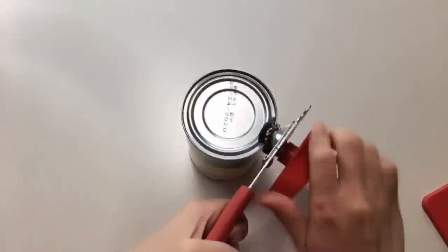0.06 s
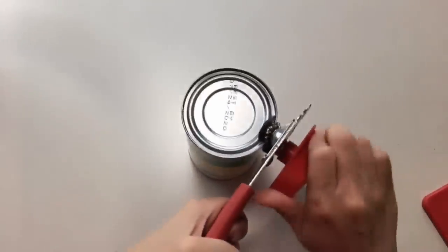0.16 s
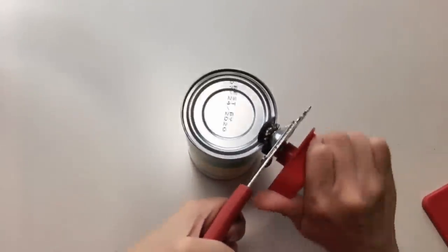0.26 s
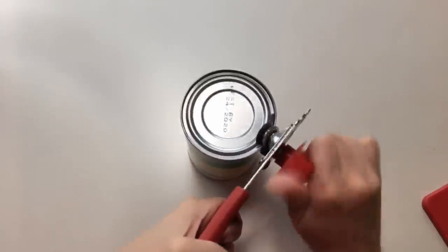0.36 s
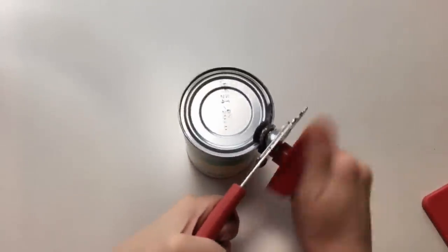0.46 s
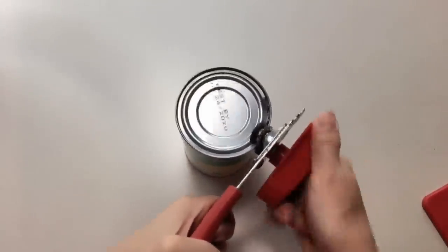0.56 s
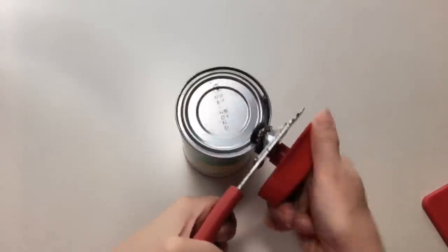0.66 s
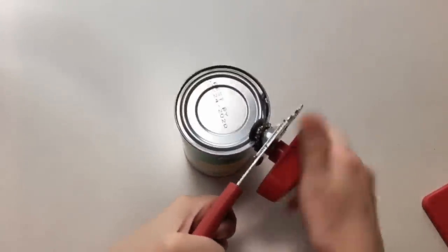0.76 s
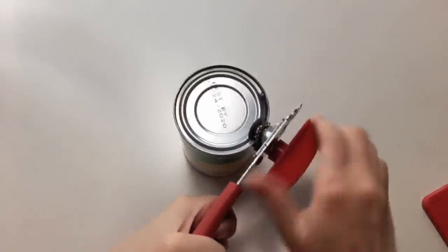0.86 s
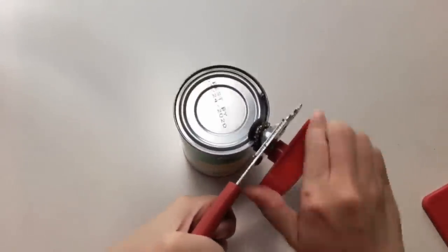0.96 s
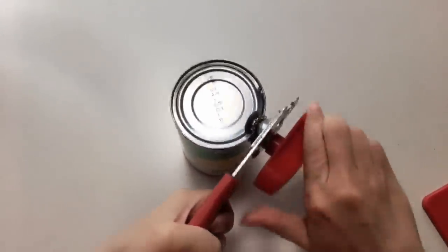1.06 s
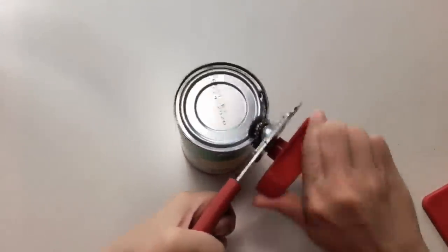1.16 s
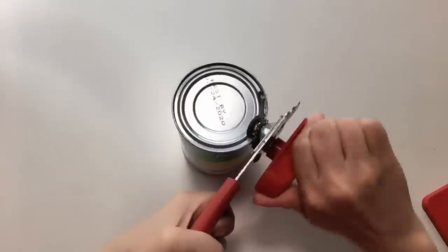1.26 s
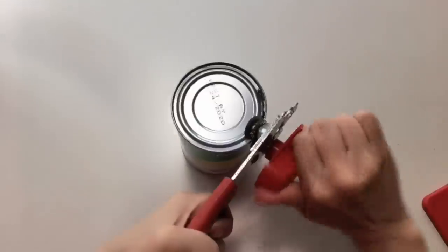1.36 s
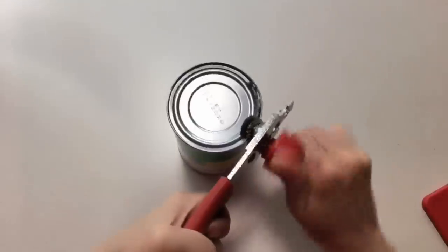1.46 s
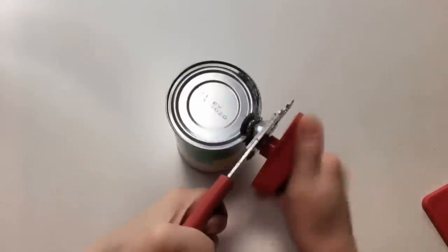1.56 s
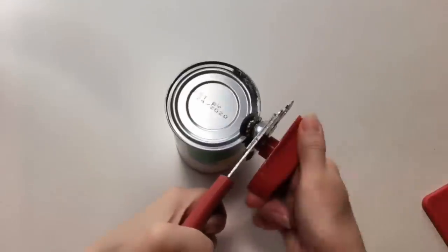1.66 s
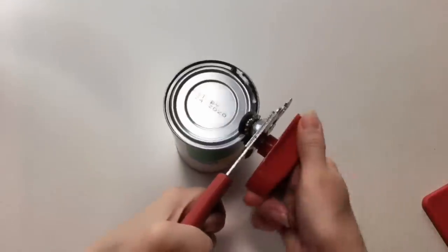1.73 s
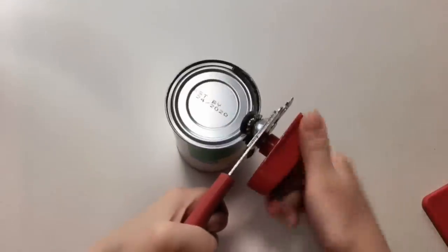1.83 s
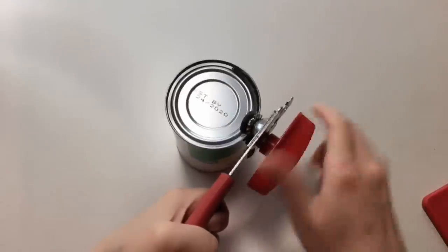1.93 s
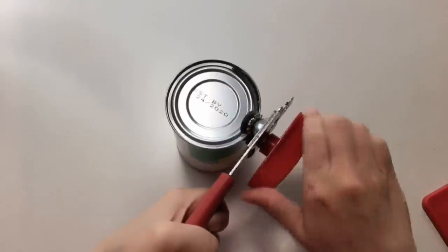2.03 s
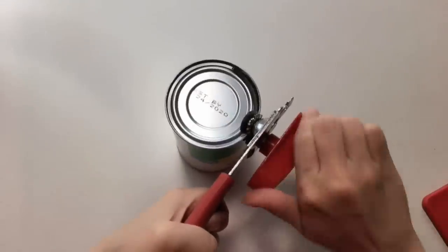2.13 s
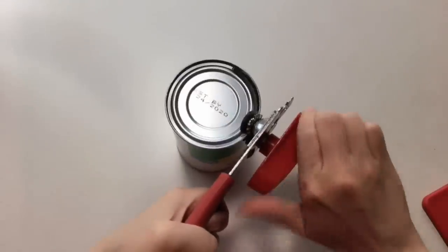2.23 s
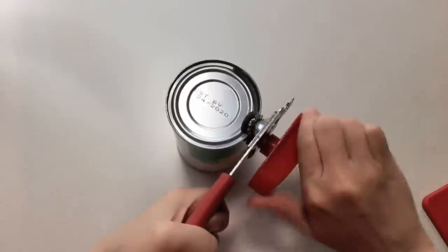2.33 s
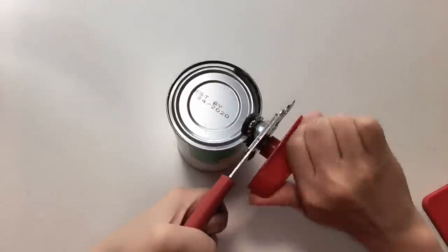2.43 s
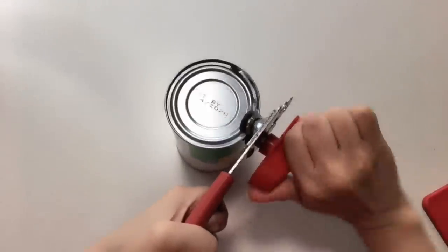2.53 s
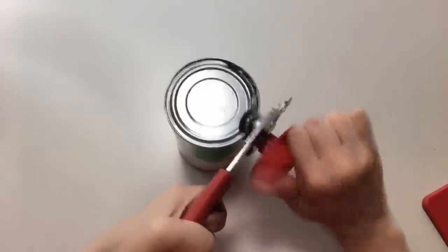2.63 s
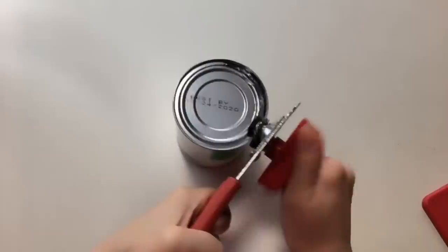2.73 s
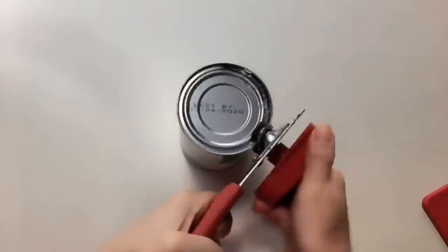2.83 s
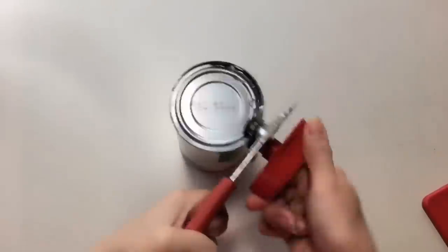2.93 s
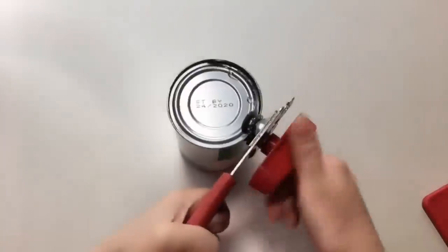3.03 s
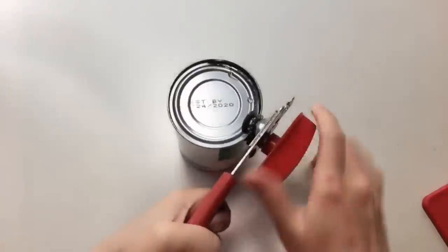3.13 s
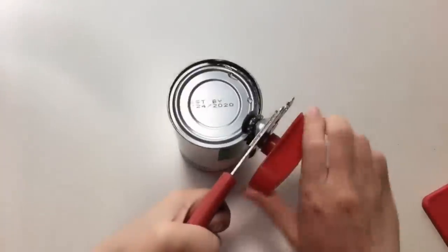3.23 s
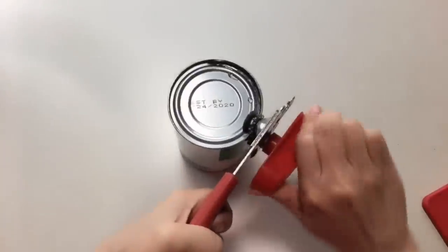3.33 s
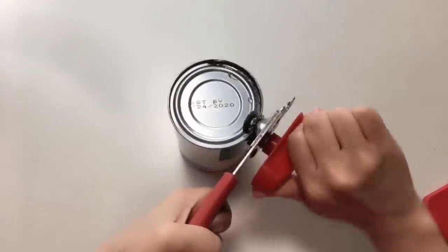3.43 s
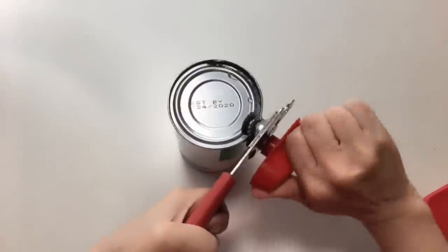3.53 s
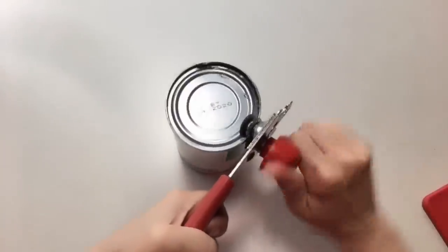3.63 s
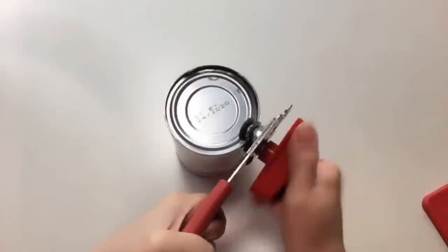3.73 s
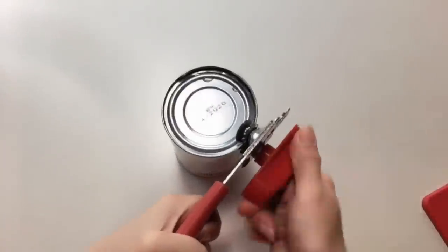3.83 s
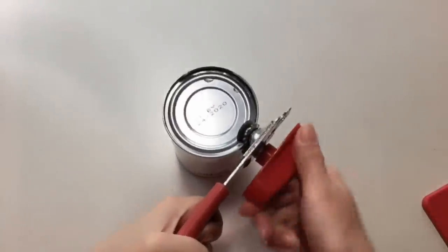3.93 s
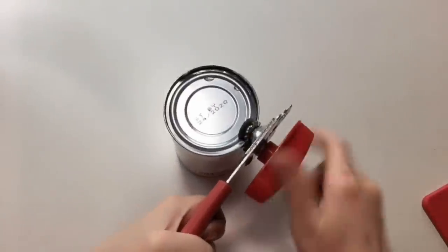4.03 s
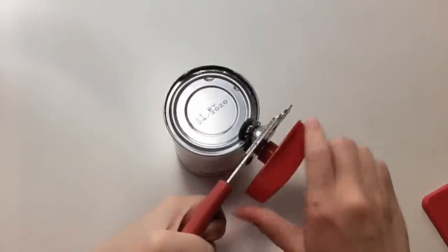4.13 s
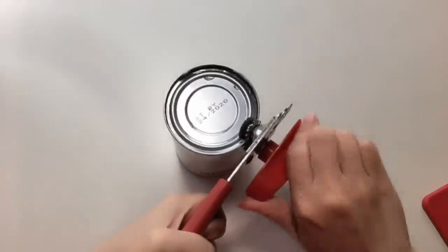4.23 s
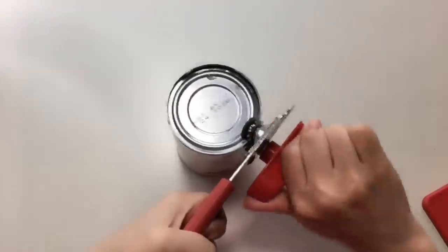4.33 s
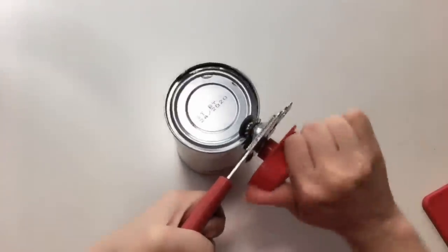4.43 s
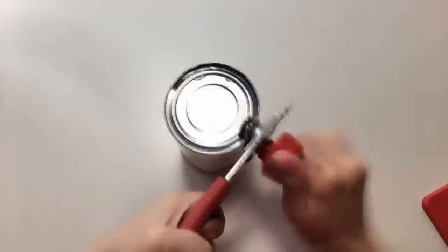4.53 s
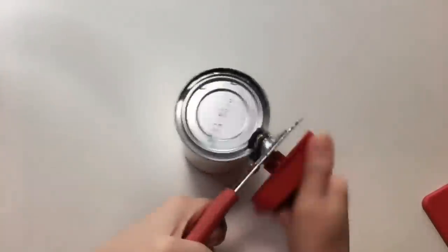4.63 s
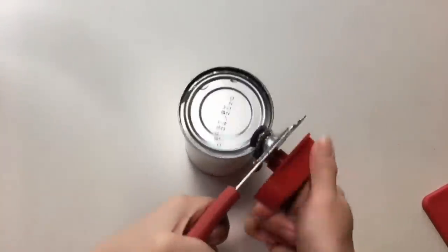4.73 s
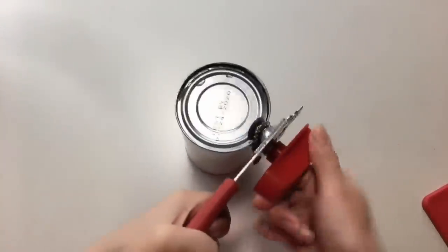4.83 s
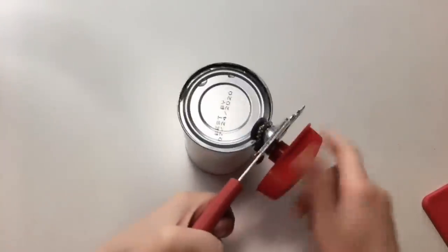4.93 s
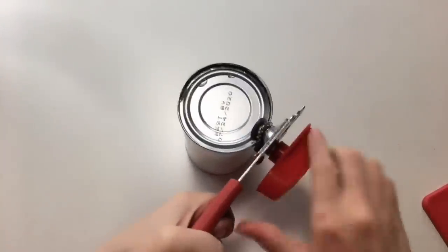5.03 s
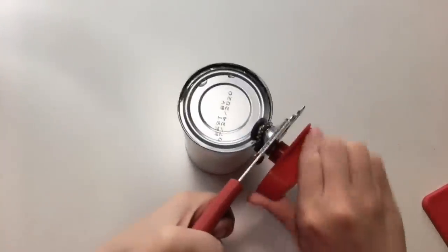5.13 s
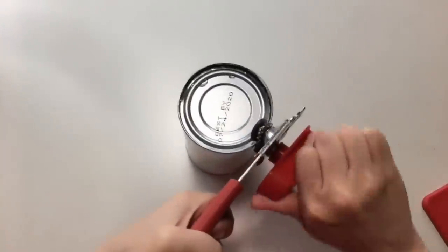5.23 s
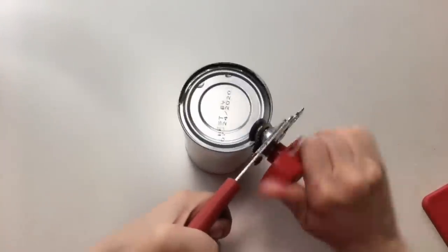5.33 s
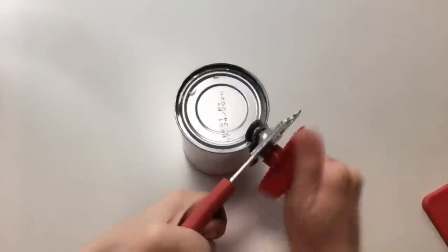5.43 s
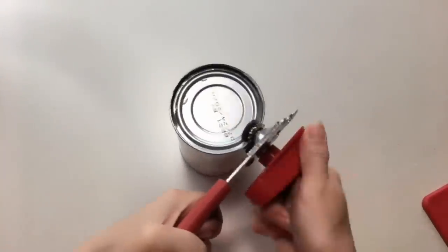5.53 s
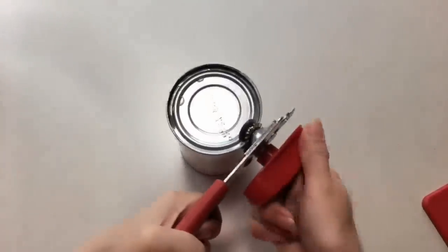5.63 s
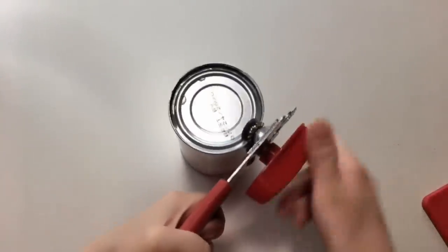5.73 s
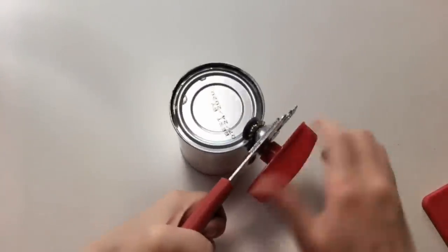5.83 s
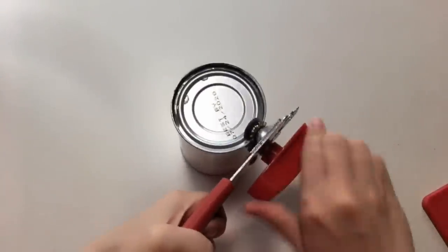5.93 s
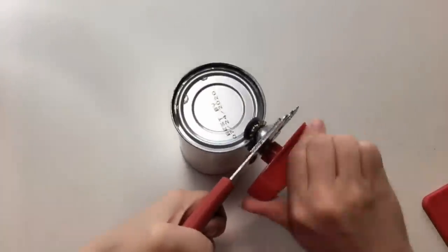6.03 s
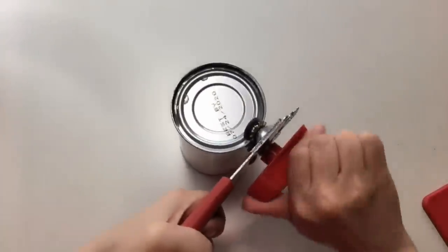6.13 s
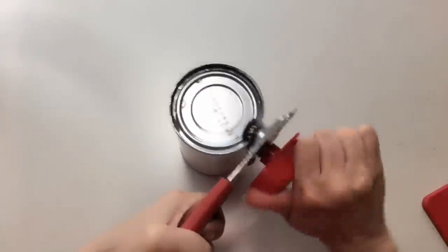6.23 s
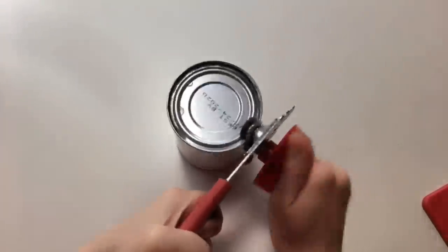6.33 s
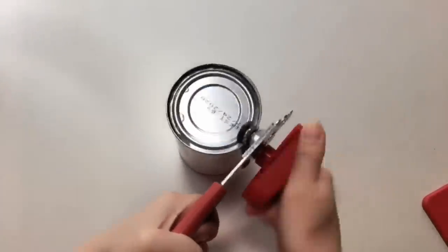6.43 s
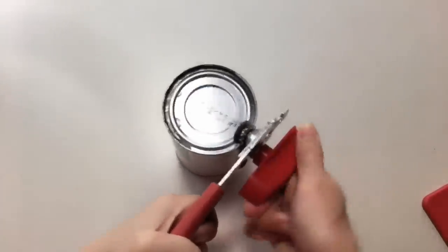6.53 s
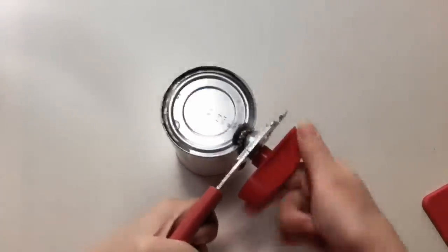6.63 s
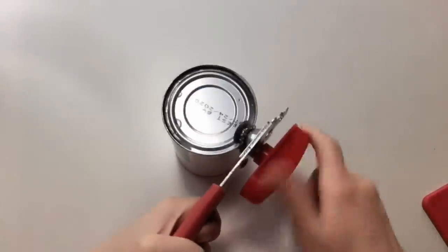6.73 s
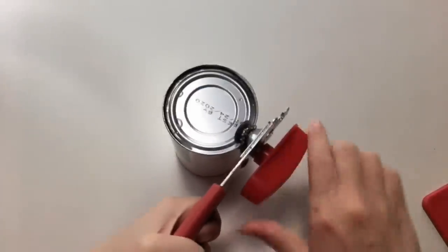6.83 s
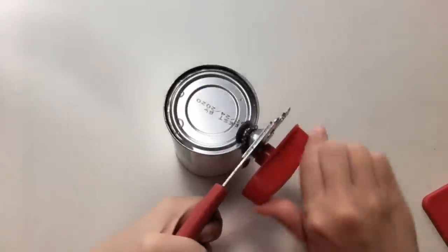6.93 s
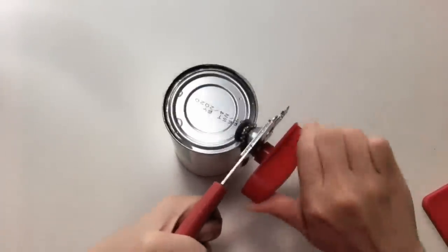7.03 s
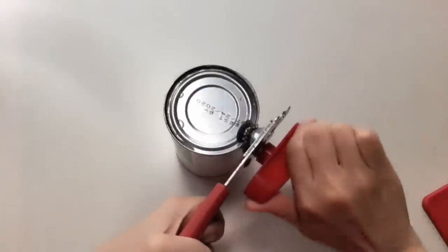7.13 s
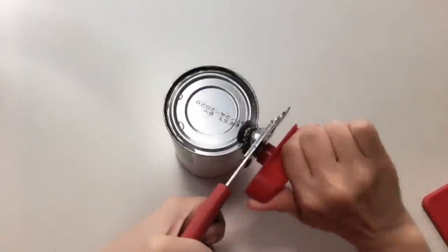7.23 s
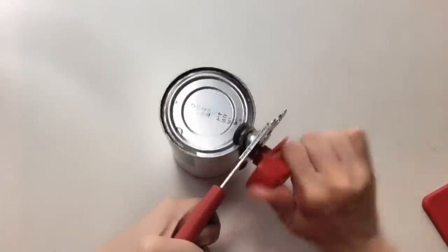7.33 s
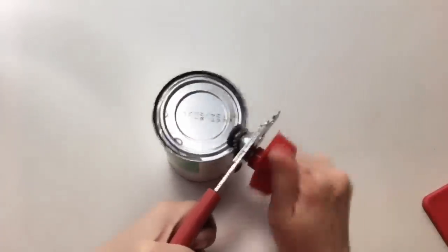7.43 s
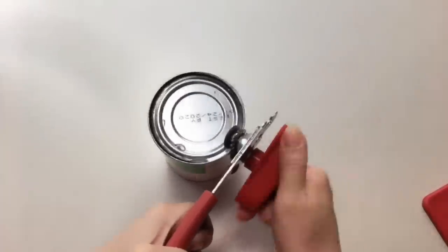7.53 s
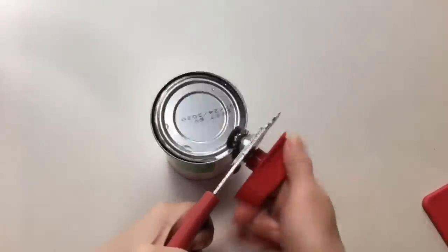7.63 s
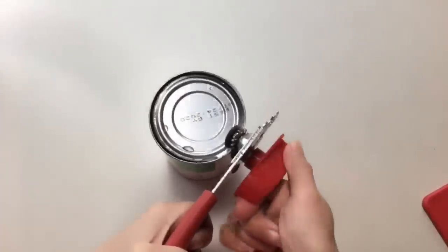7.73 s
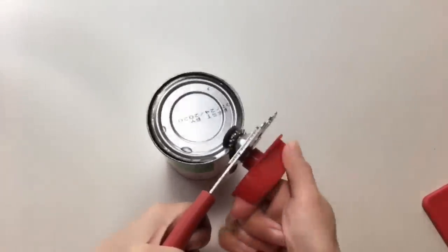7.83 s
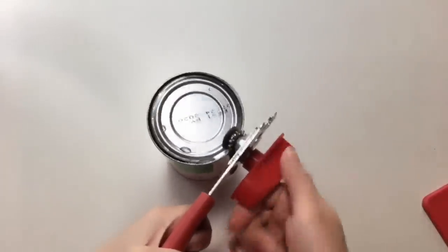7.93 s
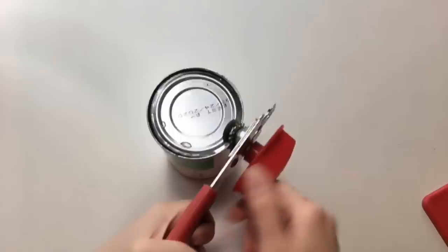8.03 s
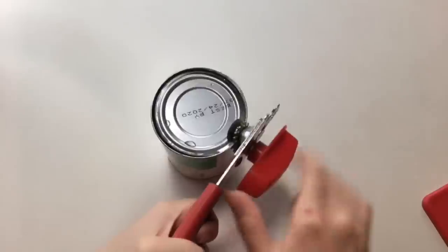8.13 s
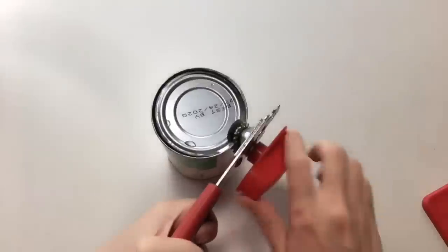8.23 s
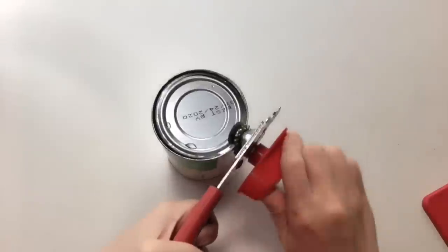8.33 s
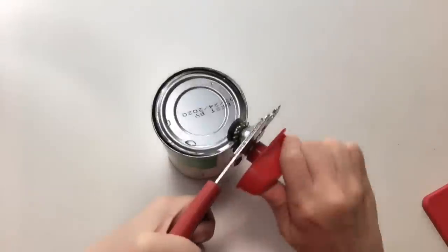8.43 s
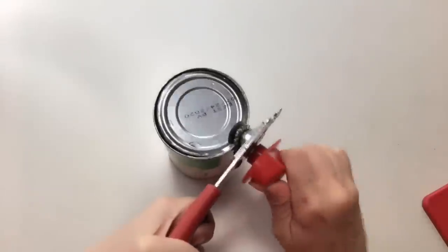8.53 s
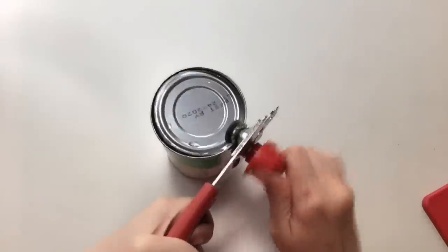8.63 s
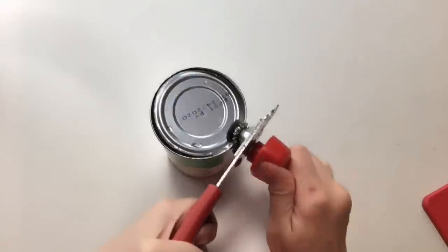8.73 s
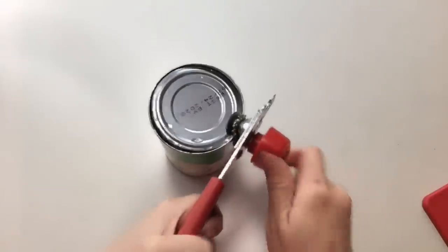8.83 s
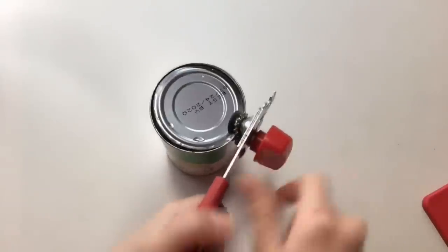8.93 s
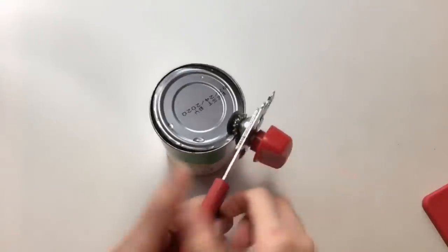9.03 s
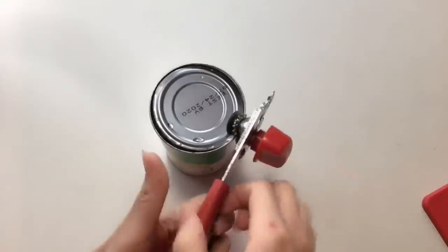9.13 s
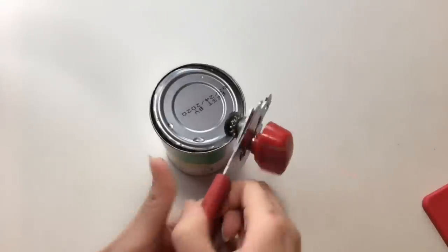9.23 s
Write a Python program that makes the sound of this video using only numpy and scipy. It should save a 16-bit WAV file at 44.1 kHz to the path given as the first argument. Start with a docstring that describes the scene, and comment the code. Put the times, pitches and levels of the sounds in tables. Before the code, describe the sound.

Close, rough metal scraping and gear clicks come in short turns, knocking the table underneath, over soft room noise and a faint appliance hum.

```python
"""A hand-cranked opener works round a tin can on a table in a quiet kitchen, the microphone lying on the same table.
Each turn drags the wheel through the lid: random tiny slips ring the can, arms and table as scrape, fizz and judder,
wobbling tones squeak, and bursts of ticks make gear teeth snap over the rim. Jolts of can and hand thump the table
as dying sines. Behind it lie drifting room noise and the faint, wavering tones of an appliance."""
import sys
import numpy as np
from scipy import signal
from scipy.io import wavfile
from scipy.ndimage import uniform_filter1d

SR = 44100
rng = np.random.default_rng(int(sys.argv[2]) if len(sys.argv) > 2 else 0)


def dump_mix(stems):
    """Bounce the given channels to the path in sys.argv[1] as a 16-bit WAV at rate SR."""
    frames = np.atleast_2d(stems).T  # one column per channel
    limited = np.clip(frames, -1, 1)  # hard clip at full scale
    pcm = np.round(limited * 32767).astype(np.int16)
    wavfile.write(sys.argv[1], SR, pcm)


N = 408366  # length in samples

# Ways the table top rings, from the deepest up; hard contact reaches the upper ones.
# Each row: pitch in Hz, relative level in dB, time to die by 60 dB in seconds.
TABLE_DEEP = [(89.5, 4.5, 0.11), (118.4, -3, 0.17)]
TABLE_LOW = [(178.8, -0.5, 0.086), (195.4, 2, 0.083), (222.8, -2, 0.083), (301, -12, 0.089)]
TABLE_UPPER = [(388.5, -8, 0.51), (416, 7, 0.093), (565.5, 2, 0.11), (602, 8.5, 0.05), (726, -22, 0.14),
               (799, -5, 0.11), (964, -9.5, 0.099), (1084.5, -8, 0.16), (1316, -3.5, 0.053)]
# Ways the can wall rings (held and full, so quickly damped), then the steel arms of the opener.
# Each row: pitch in Hz, relative level in dB, time to die by 60 dB in seconds.
CAN = [(778, 2, 0.0038), (1253, -0.5, 0.0054), (1617, -3, 0.0057), (1977, -6.5, 0.011),
       (2270, -12.5, 0.012), (2480, -7, 0.0043), (3210, -7, 0.0047)]
ARMS = [(3835, 8.5, 0.0038), (4450, 9.5, 0.0038), (5880, 13.5, 0.0024), (6860, 12, 0.0023),
        (7900, 7, 0.0039), (8240, -8.5, 0.009)]
# Pushes of the hand that drag the wheel through the lid, and short rubs as it regrips.
# Each row: start in seconds, length in seconds, then at the deepest bite: scrape level in dB,
# fizz level in dB, table judder level in dB.
PUSHES = [(0.183, 0.24, -39, -52, -29), (0.5, 0.17, -36, -42, -21.5), (0.606, 0.14, -50, -44.5, -22),
          (1.07, 0.065, -41.5, -53, -32.5), (1.236, 0.2, -44.5, -52.5, -20.5),
          (1.529, 0.11, -39.5, -48, -23.5), (1.597, 0.26, -38, -43.5, -19), (1.892, .13, -50, -51, -27.5),
          (2.709, 0.049, -40, -40, -15.5), (2.81, 0.27, -35, -42.5, -23.5), (3.134, 0.064, -52, -49, -32),
          (3.717, 0.17, -38, -50, -22.5), (3.796, 0.23, -34.5, -42, -18.5), (4.037, 0.051, -60, -46.5, -45),
          (4.576, 0.069, -41, -43.5, -21.5), (4.662, .24, -31, -38, -21.5), (5.457, 0.068, -32, -45, -18),
          (5.519, 0.26, -35, -43, -17.5), (6.024, 0.062, -50, -43, -36.5), (6.343, 0.066, -29, -47, -13.5),
          (6.423, 0.32, -35.5, -45.5, -21), (7.456, 0.33, -40.5, -48.5, -21),
          (7.62, 0.25, -42, -48.5, -24.5), (8.655, .24, -47, -64, -28.5)]


def gain_of(db):
    """Turn decibels into a plain multiplier."""
    return 10 ** (np.asarray(db) / 20)


def evened(x):
    """Scale to an average (RMS) level of one."""
    return x / np.sqrt(np.mean(x ** 2) + 1e-20)


def peaked(x):
    """Scale to a highest point of one."""
    return x / (np.max(abs(x)) + 1e-20)


def smoothed(x, size):
    """Average over neighbouring samples twice, for a gently drifting curve."""
    return uniform_filter1d(uniform_filter1d(x, size), size)


def read(points, hz):
    """Read a curve between its points, with pitch spaced as the ear hears it."""
    f, value = np.transpose(points)
    return np.interp(np.log(hz + 1), np.log(f + 1), value)


def add(mix, s, sound):
    """Lay a sound into the mix from s seconds on."""
    part = mix[max(round(s * SR), 0):][:len(sound)]
    part += sound[:len(part)]


def ring(modes, seconds, scatter_db=0.):
    """Dying sines; where the blow lands changes how strongly each mode answers."""
    hz, db, t60 = np.transpose(modes)[:, :, None]
    t = np.arange(round(seconds * SR)) / SR
    db = db + scatter_db * rng.standard_normal(hz.shape)
    return (gain_of(db - 60 * t / t60) * np.sin(2 * np.pi * hz * t)).sum(0)


def slips(per_s, spread_db):
    """Stick-slip: random tiny clicks of either sign, a few of them far from the usual size."""
    size = gain_of(spread_db * np.minimum(rng.exponential(1, N), 4))
    sign = rng.choice([-1, 1], N)
    return size * sign * (rng.random(N) < per_s / SR)


def in_push(s, settle_s=0.):
    """Tell whether moment s falls within a push, leaving out its first settle_s seconds."""
    return any(start + settle_s < s < start + length for start, length, *_ in PUSHES)


def air():
    """Room noise whose strength drifts in patches of time and pitch."""
    # Noise colour of the room. Each row: pitch in Hz, relative level in dB.
    spectrum = [(15, -41), (25, 15), (148, -15.5), (201, -12.5), (466, -18), (557, -21.5), (858, -21.5),
                (950, -20), (1140, -21.5), (8920, -38), (10900, -46.5), (14200, -96), (22000, -120)]
    level_db = -41.5
    frames, hz = N // 512 + 5, np.fft.rfftfreq(2048, 1 / SR)
    a, b, patches = rng.standard_normal((frames, 1025, 3)).T
    patches = evened(uniform_filter1d(uniform_filter1d(patches, 20, 0), 8, 1))
    patches_db = 1.2 * patches
    bins = (a + 1j * b) * gain_of(read(spectrum, hz)[:, None] + patches_db)
    noise = signal.istft(bins, nperseg=2048, noverlap=1536)[1][:N]
    return gain_of(level_db) * evened(noise)


def appliance():
    """Thin steady tones of an appliance, each wavering in level on its own."""
    # Tones of the hum. Each row: pitch in Hz, middle level in dB.
    tones = [(555, -57), (946, -54), (1065, -58), (1771, -62), (3774, -66), (5663, -76)]
    t = np.arange(N) / SR
    waver = evened(smoothed(rng.standard_normal((len(tones), N)), 4000))
    hum = np.zeros(N)
    for (hz, db), w in zip(tones, waver):
        hum += gain_of(db + 1.5 * w) * np.sin(2 * np.pi * (hz * t + rng.random()))
    return hum


def kitchen(x):
    """Echoes of the room: sparse taps of random sign, each band dying at its own speed."""
    # How long the room rings. Each row: pitch in Hz, time to die by 60 dB in seconds.
    decay = [(100, 0.38), (420, 0.26), (1100, 0.27), (2900, .2), (7700, 0.076)]
    taps = np.zeros(SR // 2)
    at = np.arange(200, SR // 2 - 20, 20)
    taps[at + rng.integers(0, 20, len(at))] = rng.choice([-1., 1.], len(at))
    hz, t, z = signal.stft(taps, SR, nperseg=256)
    fading = z * gain_of(-60 * t / read(decay, hz)[:, None])
    tail = signal.istft(fading, SR, nperseg=256)[1]
    return signal.fftconvolve(x, tail / np.linalg.norm(tail))[:N]


def thumps():
    """A soft push rings the table, which takes a few ms to swing up; a harder contact reaches its upper modes."""
    # Jolts of can and hands into the table. Each row: time in seconds, level of the low modes in dB,
    # level of the deepest modes against those in dB.
    jolts = [(0.176, -4.5, -0.5), (0.234, -43, -9), (0.315, -16, 0), (0.373, -15, -19), (0.522, -10.5, 0),
             (0.56, -12, 5), (0.639, -5, 1.5), (0.7, -10, -5), (0.766, -15, -8), (0.876, -4.5, -3),
             (0.934, -12, -3), (0.983, -14, -4), (1.165, -24, -15), (1.269, -8, 1), (1.288, -18, -13),
             (1.354, -16, -8), (1.597, -11, -10), (1.753, -4, -6.5), (1.796, -18.5, 5), (1.886, -9, -10),
             (1.98, -18.5, 0), (2.097, -18.5, -2), (2.31, -48, -10), (2.67, -6.5, -6), (2.727, -13.5, -4),
             (2.811, -1.5, -6.5), (2.868, -12, 2), (3.135, -23.5, 8.5), (3.206, -8.5, -8),
             (3.451, -18, -4.5), (3.658, -24, -9), (3.807, -4.5, 0.5), (3.84, -10, -4.5),
             (3.917, -3.5, -4.5), (3.956, -7.5, -4.5), (4.165, -28.5, 11.5), (4.455, -11, -1),
             (4.533, -4, -1.5), (4.585, -12, -5), (4.713, -12, 1), (4.745, -19, -1), (4.811, -20, 12),
             (4.952, -8, 0.5), (5.058, -13.5, 2.5), (5.37, -23.5, 1), (5.462, -15, -8), (5.533, -10, 3),
             (5.579, -10, 4.5), (5.654, -17, 4), (5.695, -15.5, 7.5), (5.738, -21.5, -8), (5.941, -16, 2),
             (5.98, -37, 12), (6.116, -14.5, -2), (6.17, -18, -5), (6.229, -24, -13), (6.346, -19, -13),
             (6.434, -6.5, -8), (6.499, -17.5, 5), (6.61, -15.5, 5), (6.714, -6.5, -4), (6.872, -19, -2),
             (6.923, -16, 0.5), (7.07, -27.5, 5), (7.157, -11, -8.5), (7.258, -16.5, -5.5),
             (7.335, -18, -2), (7.438, -20.5, -3), (7.548, -28, 3), (7.628, -5.5, -1.5), (7.688, -20, 2),
             (7.746, -20.5, 7.5), (7.814, -17.5, 4), (8.281, -6.5, -3.5), (8.398, -47, 25.5),
             (8.59, -8, -6), (8.694, -16, -0.5), (8.839, -21.5, 7), (9.029, -6.5, 2.5), (9.177, -21, 1)]
    # share of the upper modes in a 0 dB jolt: metal on rim while turning, or hand at rest
    hard_turning_db, hard_resting_db = -8.5, -14.5
    duller_db_per_db = 0.6428  # heavier jolts have less of the upper modes
    out = np.zeros(N)
    swing = (1 - np.exp(-np.arange(SR // 4) / SR / 0.0026)) ** 2
    for s, db, weight_db in jolts:
        hard_db = (hard_turning_db if in_push(s) else hard_resting_db) - duller_db_per_db * db
        deep = peaked(swing * ring(TABLE_DEEP, .25, scatter_db=2.))
        low = peaked(swing * ring(TABLE_LOW, .25, scatter_db=2.))
        upper = peaked(ring(TABLE_UPPER, .25, scatter_db=3.5))
        add(out, s, gain_of(db) * (gain_of(hard_db) * upper - low - gain_of(weight_db) * deep))
    return out


def squeaks():
    """The blade's slips lock on to one lid mode: a slightly rough, wobbling tone that swells and breaks off."""
    # Each row: start in seconds, length in seconds, pitch in Hz, level in dB before roughening.
    cries = [(0.496, 0.052, 1227, -21), (0.545, 0.036, 1200, -18), (0.54, 0.064, 2000, -37),
             (0.609, 0.027, 1286, -14.5), (1.226, 0.066, 1220, -36), (1.53, 0.028, 975, -24),
             (1.708, 0.029, 1275, -25), (2.713, 0.027, 1289, -25), (2.715, 0.018, 1294, -22),
             (2.847, 0.019, 1274, -23), (2.863, 0.011, 1270, -27), (2.872, 0.031, 1270, -23.5),
             (2.915, 0.035, 1293, -29.5), (2.965, 0.048, 1327, -31), (3.715, 0.033, 1604, -31.5),
             (3.824, 0.025, 1625, -31), (3.959, 0.019, 2385, -22), (4.658, 0.033, 1119, -16.5),
             (4.836, 0.019, 2760, -27), (4.876, 0.016, 1480, -28), (6.647, 0.023, 1825, -32.5),
             (7.458, 0.038, 1950, -29.5), (7.511, 0.11, 1690, -33), (7.562, 0.042, 3380, -35),
             (7.621, 0.017, 2900, -28), (7.634, 0.023, 2314, -10.5), (8.605, 0.015, 2150, -33.5),
             (8.682, 0.027, 2390, -24), (8.801, 0.054, 2334, -32)]
    out = np.zeros(N)
    for s, length, hz, db in cries:
        u = np.linspace(0, 1, round(length * SR))
        wander = evened(uniform_filter1d(rng.standard_normal((2, 5000)), 120))
        wobble, rough = wander[:, :len(u)]
        pitch = hz * (1 + 0.029 * wobble + hz / 1000 * 0.017 * rough)
        tone = np.sin(2 * np.pi * np.cumsum(pitch) / SR) * (1 + 0.65 * rough)
        add(out, s, gain_of(db) * tone * np.sin(np.pi * u ** 1.23))
    return out


def pushes():
    """Turning (0 to 1) and the gains of scrape, fizz and judder: a push moves to its deepest bite, then eases off."""
    bite_at = 0.28  # share of the push at which the wheel bites deepest
    # dB at the start and end of a push, against its deepest bite: scrape, fizz, judder
    ends_db = (3.5, -14.5), (0.49, -10.5), (-2.2, -7.5)
    t, gains = np.arange(N) / SR, np.zeros((4, N))
    for start, length, *levels_db in PUSHES:
        on = (t > start) & (t < start + length)
        gains[0, on] = 1
        progress = (t[on] - start) / length
        for gain, db, (first, last) in zip(gains[1:], levels_db, ends_db):
            gain[on] = gain_of(db + np.interp(progress, [0, bite_at, 1], [first, 0, last]))
    return uniform_filter1d(gains, size=600)


def cutting():
    """Slips of the wheel come in clumps and drive the can; finer ones fizz in the arms; slow ones shake the table."""
    turning, scraping, fizzing, shaking = pushes()
    clumps = gain_of(4.7 * evened(smoothed(rng.standard_normal(N), 200)))
    # the grip shifts, so each mode of the wall swells on its own
    colours = gain_of(3.7 * evened(smoothed(rng.standard_normal((len(CAN), N)), 500)))
    drive = clumps * slips(2500, spread_db=3.5)
    wall = np.zeros(N)
    for colour, mode in zip(colours, CAN):
        wall += signal.oaconvolve(drive * colour, ring([mode], .1))[:N]
    wall = evened(wall)
    fine_slips = clumps ** 0.63 * slips(7000, spread_db=5.5)
    fizz = evened(signal.oaconvolve(fine_slips, ring(ARMS, 0.018))[:N])
    sparse_slips = clumps * slips(380, spread_db=-2.0)
    rattle = evened(signal.oaconvolve(sparse_slips, ring(TABLE_UPPER, .2))[:N])
    slow_slips = slips(150, spread_db=1.5)
    judder = evened(signal.oaconvolve(slow_slips, ring(TABLE_DEEP + TABLE_LOW, .25))[:N])
    resting = gain_of(-37.5) * (1 - turning)  # hands still tremble the table between turns
    scrape = wall + gain_of(-2.0) * rattle
    return scraping * scrape + fizzing * fizz + (shaking + resting) * judder


def snaps():
    """A tooth drags, then slips in a swelling and dying burst of ticks that rings the tin and the steel arms."""
    # Gear teeth snapping over the rim and small ticks of the arms. Each row: time in seconds,
    # level of the can's ring in dB, level of the arms' ring against it in dB.
    teeth = [(0.176, -10, -18), (0.2098, -11, -3), (0.2333, -14.5, -18), (0.317, -27, -1),
             (0.5122, -11, -0.5), (0.5585, -10, -30), (0.6136, -8, -31), (0.6285, -10, -4.5),
             (0.6428, -4.5, -22), (0.659, -18, -9), (0.7063, -9.5, -13.5), (0.7186, -19, -11),
             (0.7517, -1, -16), (0.8813, -9, -23), (0.9, -34, 5.5), (1.058, -27.5, -4.5), (1.079, -26, -6),
             (1.183, -28, -10), (1.267, -23.5, -6), (1.289, -22.5, -16), (1.6032, -18, -43),
             (1.6713, -16.5, -16), (1.6997, -20, 0.5), (1.72, -22.5, 0), (1.751, -8.5, -10),
             (1.8006, -10.5, -6.5), (1.8103, -14, -13), (1.8863, -11, -29), (2.0961, -10, -29),
             (2.6708, -14.5, -20), (2.7114, -20, -13), (2.729, -4.5, -36), (2.8126, -2.5, -18),
             (2.8236, -7, -11), (2.8428, -11, -12), (2.8888, -17, -25), (3.1413, -22.5, -0.5),
             (3.2041, -12.5, -22), (3.7332, -22, -21), (3.8059, -5, -30), (3.838, -6, -31),
             (3.869, -19.5, 0), (3.886, -15, -14), (3.9184, -19, -8), (3.9393, -3, -27), (3.9627, -7, -5.5),
             (4.1122, -18.5, 0.5), (4.535, -3.5, -18), (4.5762, -12, -5.5), (4.5909, -10.5, -20),
             (4.6699, -3.5, -0.5), (4.709, -5.5, -7.5), (4.7431, -6, -8.5), (4.7697, -8, -5),
             (4.825, -11, -11), (4.9534, -9, -16.5), (5.0614, -20, -9.5), (5.4663, -11, -33),
             (5.4948, -11.5, -17), (5.5346, -12, -11), (5.555, -10.5, -15), (5.5794, -8, -23),
             (5.6195, -10.5, -15), (5.648, -10, -7.5), (5.6974, -3, -11.5), (5.7338, -10, -25),
             (5.9349, -21.5, -35), (6.3425, -17, -4.5), (6.3561, -12.5, -8), (6.4344, -9, -9),
             (6.4399, 2.5, -7), (6.4564, -8, -8), (6.4726, -10, -16), (6.5605, -19, -7), (6.5976, -17, -7),
             (6.6179, -12, -15.5), (6.7166, -4.5, -27), (6.78, -26.5, -5), (6.924, -21.5, -15),
             (7.023, -35, -3), (7.1556, -10.5, -19.5), (7.4868, -13.5, -12), (7.5963, -13, -12),
             (7.6302, -5.5, -26), (7.6868, -9.5, -12.5), (7.7429, -8.5, -9.5), (7.8132, -10, -7.5),
             (8.078, -32.5, -1), (8.2771, -14, -14), (8.316, -33, 0.5), (8.441, -34.5, -1),
             (8.5898, -17.5, -22), (8.6926, -13.5, -3), (8.8185, -24.5, 5), (8.838, -20.5, -5),
             (9.0279, -16.5, -16), (9.0416, -7.5, -22.5), (9.1441, -31, 6)]
    drag_s, drag_db = 0.0061, -17.5  # in mid push a swelling hiss leads up to the slip
    slip_s, knock_s = 0.0018, 0.0012  # pace of letting go in mid push; a bare knock is shorter
    out, lead = np.zeros(N), 1500  # lead: samples kept ahead of the snap for the drag
    t = np.arange(-lead, 1200) / SR
    for s, db, bright_db in teeth:
        loaded = in_push(s, settle_s=.02)
        u = np.maximum(t, 0) / (slip_s if loaded else knock_s)
        ticks = rng.standard_normal(len(t)) * rng.random(len(t)) ** 2
        burst = ticks * u * np.exp(-u ** 0.97)
        drag = loaded * ticks * gain_of(drag_db) * np.exp(np.minimum(t, 0) / drag_s - u)
        # a dull snap is a longer contact (in samples)
        contact = np.hanning(round(np.clip((10 if loaded else 16) - .6 * bright_db, 8, 34)))
        can = np.convolve(ring(CAN, .04, scatter_db=3.5), contact)
        arms = ring(ARMS, .02, scatter_db=2.5)
        low = peaked(signal.fftconvolve(burst, can))
        high = peaked(signal.fftconvolve(burst + drag, arms))
        add(out, s - lead / SR, gain_of(db) * low)
        add(out, s - lead / SR, gain_of(db + bright_db) * high)
    return out


def scene():
    """Sum the direct sounds, their echoes in the kitchen and the background."""
    table, steel, lid = thumps(), snaps() + cutting(), squeaks()
    sent_to_room = gain_of(-14) * table + gain_of(-12) * steel + gain_of(-20) * lid
    return (table + steel + lid + kitchen(sent_to_room) + air() + appliance())[None]


def record(dry):
    """Bass roll-off of the microphone, softer treble, clipping, one brief dip in level, band limit."""
    dip_from_s, dip_to_s, dip_db = 7.832, 7.844, -28.0
    band_limit_hz = 10900
    colour = signal.sosfilt(signal.butter(4, 65, "highpass", fs=SR, output="sos"), dry)
    colour = signal.sosfilt(signal.butter(4, 9600, fs=SR, output="sos"), colour)
    t = np.arange(N) / SR
    outside_dip = (t < dip_from_s) | (t > dip_to_s)
    level = uniform_filter1d(np.where(outside_dip, 1., gain_of(dip_db)), size=40)
    clipped = np.clip(colour, -.96, .96) * level
    band_limit = signal.firwin(511, band_limit_hz, window=("kaiser", 9), fs=SR)
    return signal.oaconvolve(clipped, band_limit[None], "same")


dry = scene()
out = record(dry)
dump_mix(out)
```